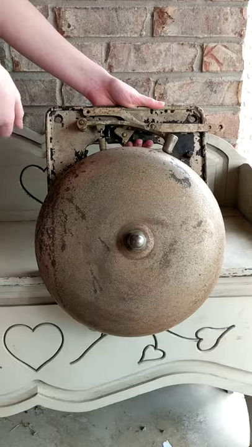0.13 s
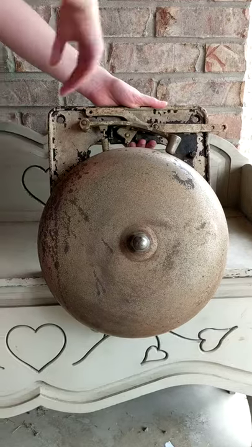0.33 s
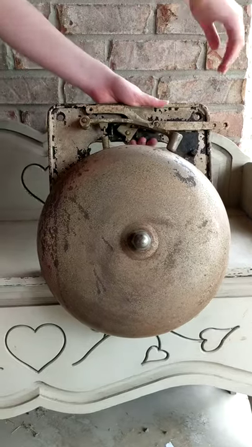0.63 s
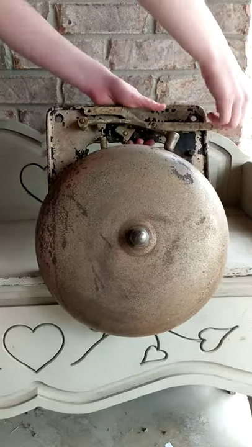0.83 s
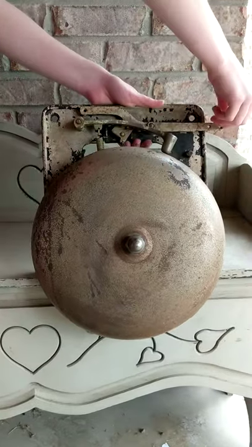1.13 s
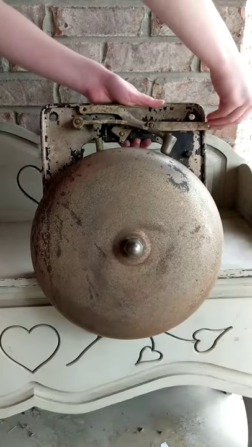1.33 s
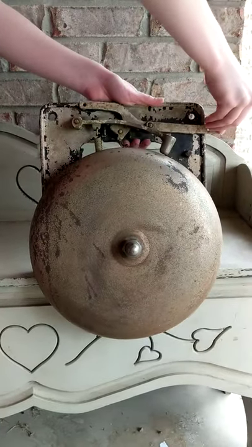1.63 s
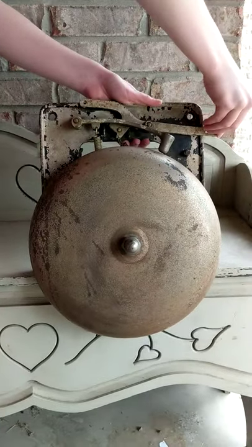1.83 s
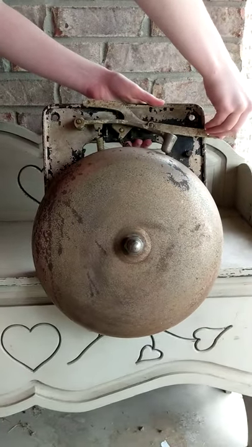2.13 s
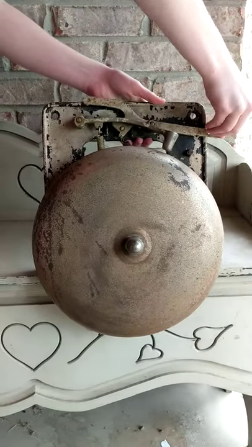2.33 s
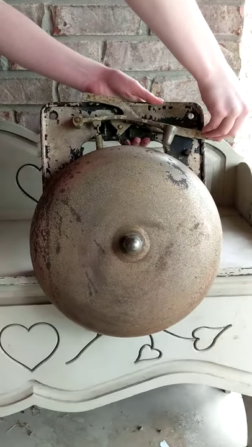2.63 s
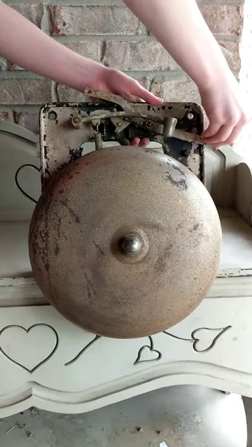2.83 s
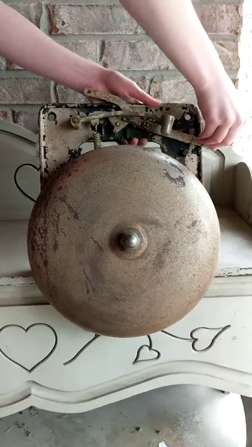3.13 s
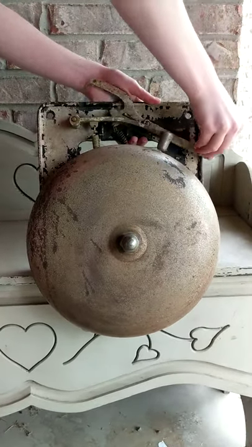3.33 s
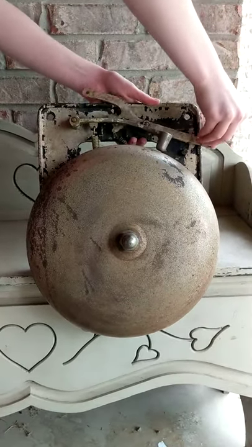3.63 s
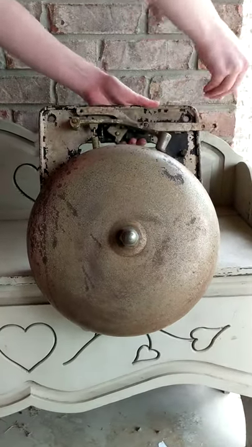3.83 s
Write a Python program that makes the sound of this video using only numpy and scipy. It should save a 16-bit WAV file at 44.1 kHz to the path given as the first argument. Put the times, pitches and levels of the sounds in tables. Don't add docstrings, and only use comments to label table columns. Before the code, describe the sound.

After over three seconds of low hush, faint bird chirps and soft bumps, a hammer hits a metal gong once, hard and bright; the ring fades fast and the lever clicks home. Close, slightly overloaded recording.

```python
import sys
import numpy as np
from scipy import signal
from scipy.fft import rfft, irfft
from scipy.io import wavfile
from scipy.ndimage import uniform_filter1d

SR = 44100
rng = np.random.default_rng(int(sys.argv[2]) if len(sys.argv) > 2 else 0)


def invert_db(x):
    u = np.asarray(x, float) / 20
    return 10 ** u


def put_to_file(sound):
    columns = np.atleast_2d(sound).T
    safe = np.clip(columns, -1, 1)
    whole_steps = np.round(safe * 32767)
    wavfile.write(sys.argv[1], SR, whole_steps.astype(np.int16))


N = 176400

# pitch_hz, level_db, t60_s
RIM_MODES = [(247.1, -56, 40), (631.5, -45, 7.5), (1093.4, -49, 6), (1617.9, -33.5, 1.4),
             (2188.1, -44, 3.4), (2814.2, -18, 1.13), (3490.2, -23, 1.05), (4208.5, -20, .47),
             (4986.5, -17, .32), (5810.6, -28, .52), (6679.8, -16, .35), (7608, -11.5, .21),
             (8580.6, -10, .29), (9609.9, -17, .22)]
# offset_hz, level_db, t60_s, lead_turns
RIM_TWINS = [(-5.7, -57.5, 40, .19), (-2.4, -66, 40, .04), (3.2, -54, 8, -.27), (-1.3, -34.5, 3, -.46),
             (4.6, -45, 3.5, -.12), (1.4, -46, 40, -.34), (-3.6, -40, 1.13, .12), (3.2, -22, .4, -.49),
             (3, -36, .58, -.46), (5, -47, .6, .1), (1.3, -42, .77, .37), (6, -42, .45, .1),
             (5.5, -20.5, .49, -.41), (6.8, -41, .46, .33)]
# pitch_hz, level_db, t60_s
DOME_MODES = [(1979, -46.5, 1.05), (1992, -44, .95), (2191, -15, .17), (2711, -45, 1.2), (3235, -57.5, 5.8),
              (4002, -17, .19), (4432, -48, 1), (4679, -29, .3), (5106, -29, .45), (5192, -15.5, .21),
              (5528, -30, .4), (5561, -31, .45), (5629, -31.5, .95), (5634, -36, .6), (5675, -15, .14),
              (5678, -41, 1.1), (6273, -37, .39), (6419, -16.5, .19), (7189, -19, .28), (7334, -18, .27),
              (7524, -27, .33), (7638, -28, .3), (7679, -32, .44),
              (8793, -27, .33), (9012, -29, .52), (9120, -26, .34), (9243, -29, .31), (9838, -32, .47),
              (9916, -37, .33), (10048, -35, .43), (10251, -37, .24), (10693, -19, .22), (10696, -36, .5),
              (11088, -41, .4), (11421, -31, .38), (11464, -43, .4), (11499, -49, .6), (11575, -38, .22),
              (11832, -28, .18), (12381, -54, .47), (12527, -38, .25), (13050, -55, .3), (13520, -47, .25),
              (14248, -38, .26), (14530, -48, .29), (14968, -72, .9), (15350, -55, .3), (15563, -38, .16),
              (15597, -44, .27), (16450, -56, .25), (16869, -42, .17), (16906, -44, .24)]
# start_s, thud_db, clack_db, length_s, clack_treble_db
BLOWS = [(2.176, -45.5, -72, .016, -25), (2.192, -46, -84, .008, -25), (2.35, -63, -95, .02, -20),
         (3.372, -58, -55, .012, -10), (3.381, -43, -58, .016, -10), (3.4017, -40, -19, .002, -8),
         (3.4033, -16.5, 4.5, .009, -10), (3.777, -40, -31, .0069, -5), (3.7889, -31, -9, .0033, 0),
         (3.7945, -31, -20, .002, 0), (3.7995, -45, -23, .002, 0), (3.8045, -45, -19, .0012, 0),
         (3.819, -48, -27, .002, 0)]
# pitch_hz, level_db, t60_s
TABLE_MODES = [(65, -2, .05), (130, -1, .09), (158, -7, .1), (297, -6, .06), (393, -11, .08), (482, 1, .1),
               (560, -8, .05), (680, -1, .05), (820, -12, .05), (975, -6, .07), (1320, -15, .04),
               (1830, -22, .03)]
# frequency_hz, density_db
THUD_SPECTRUM = [(35, -38), (60, -9.5), (669, -11), (1080, -21), (1340, -10), (1510, -19), (9000, -47),
                 (11700, -75), (19800, -120)]
# frequency_hz, density_db
CLACK_SPECTRUM = [(300, -23.5), (1500, -13.5), (3500, -9), (6500, -9.5), (9000, -5.5), (11500, -24),
                  (14800, -25), (15900, -56)]
# pitch_hz, level_db, t60_s
LEVER_MODES = [(5670, -8, .035), (6600, -2, .012), (8530, -1, .018), (11200, -14, .015)]
# start_s, pitch_hz, level_db, length_s
TABLE_BUMPS = [(0.468, 76.2, -47.5, 0.073), (.985, 152, -42.5, 0.022), (1.166, 270, -57, 0.044),
               (1.402, 274, -46, 0.034), (1.694, 717, -64, .03), (1.76, 700, -65, .035),
               (2.246, 250, -52, 0.019), (2.76, 465, -61.5, 0.036), (2.817, 79.1, -47.5, 0.05),
               (3.455, 162, -32, .05), (3.56, 170, -42, .06), (3.64, 72, -51, .06), (3.5, 95, -42, .06),
               (2.34, 590, -59, .025), (3.58, 490, -48, .1), (3.81, 400, -36, .035), (3.92, 405, -46, .05),
               (2.24, 420, -60, .04), (3.404, 305, -18, .025), (3.408, 478, -19, .022), (3.45, 360, -30, .04),
               (2.179, 705, -46, .012), (2.255, 180, -49, .03), (1.96, 72, -50, .06)]
# start_s, length_s, level_db
FINGER_BRUSHES = [
    (0.959, 0.28, -70.5),
    (1.68, 0.061, -69.5),
    (1.7, .014, -70),
    (2.95, 0.096, -70.5),
]
# frequency_hz, level_db
BRUSH_SPECTRUM = [(1500, -25), (4000, -6), (8500, -7), (9600, -8), (10500, -22)]
# start_s, length_s, start_hz, end_hz, level_db
BIRD_WHISTLES = [(0.1, .06, 8000, 7950, -74), (.2, 0.055, 4300, 4246, -66.5),
                 (0.329, 0.11, 4300, 4300, -69.5), (.485, 0.055, 4280, 4300, -74),
                 (.25, 0.021, 3490, 2960, -64.5), (0.365, .035, 4100, 2960, -66),
                 (0.413, 0.026, 3300, 3050, -66.5), (0.439, 0.027, 3530, 2660, -68),
                 (1.38, 0.2, 6540, 6580, -73.5), (1.376, 0.14, 6860, 6800, -76),
                 (1.703, 0.152, 4150, 4080, -73), (1.699, .12, 3680, 3550, -75.5),
                 (1.76, 0.12, 4350, 3850, -77), (1.7, .012, 3350, 3750, -67),
                 (1.852, 0.03, 3150, 3500, -70), (1.83, .02, 3300, 2900, -72), (1.14, .07, 4780, 4740, -74),
                 (2.034, .12, 5380, 5230, -75.5)]
SEEP_STARTS = [.305, .465, .59, .715, .835, .96]
CHIP_STARTS = [.525, .648, .772, .897, 1.019, 1.14]
# frequency_hz, density_db
HUSH_SPECTRUM = [(15, -52), (25, -7.5), (70, 0.5), (173, -8), (204, -18), (267, -14), (323, -19),
                 (3280, -33), (16800, -48)]
# frequency_hz, t60_s
ROOM_DECAY = [(100, 0.21), (500, 0.34), (2000, 0.25), (6000, 0.23), (14000, 0.15)]

STRIKE_S, STRIKE_RISE_S = 3.4027, 0.002
RIM_DB = 3
BLOOM_DB, BLOOM_S, BLOOM_TOP_HZ = -6, 0.02, 3000
SWARM_DB, SWARM_TILT_DB_PER_KHZ, SWARM_T60_S = -45.5, -2.5, 0.29
SWARM_LO_HZ, SWARM_HI_HZ = 2310, 16440
THUD_RISE_S, SHUDDER_S = 0.0023, 0.0093
TABLE_DB, LEVER_DB = 4.5, -4.5
SPOT_DETUNE, SPOT_DB = 0.03, 3
SEEP_HZ, SEEP_DB, SEEP_LENGTH_S = 7270, -71.5, 0.036
CHIP_DB, CHIP_TOP_HZ, CHIP_END_HZ, CHIP_LENGTH_S = -68, 4730, 3196, 0.042
ROOM_DB = -4
LATE_DB, LATE_STRETCH = -26, 2.9
HUSH_DB, PATCH_DB = -55.5, 0.5
RUMBLE_HZ, RUMBLE_LUMP_DB = 250, 2
MIC_LOW_HZ, CEILING = 40, 0.88
START_S, FADE_DB, FADE_S = 0.1, -4.5, 0.32
DUCK_DB, DUCK_ATTACK_S, RECOVER_DB_PER_S = 16, 0.0012, 27


def evened(x):
    return x / np.sqrt(np.mean(x ** 2) + 1e-20)


def read(points, hz):
    point_hz, value = np.transpose(points)
    return np.interp(np.log(hz + 1), np.log(point_hz + 1), value)


def add(mix, start_s, sound):
    part = mix[round(start_s * SR):][:len(sound)]
    part += sound[:len(part)]


def coloured(spectrum, size):
    gain = invert_db(read(spectrum, np.fft.rfftfreq(size, 1 / SR)))
    white = rng.standard_normal(size)
    return evened(irfft(rfft(white) * gain, size))


def ring(modes, t):
    return sum(invert_db(db - 60 * t / t60) * np.sin(2 * np.pi * (hz * t + rng.random()))
               for hz, db, t60 in modes)


def gong():
    out = np.zeros(N)
    t = np.arange(0, N / SR - STRIKE_S, 1 / SR)
    sound = ring(DOME_MODES + swarm(), t)
    for (hz, db, t60), (offset_hz, twin_db, twin_t60, lead) in zip(RIM_MODES, RIM_TWINS):
        turns = hz * t + rng.random()
        twin_turns = turns + offset_hz * t + lead
        swell_db = RIM_DB + BLOOM_DB * np.exp(-t / BLOOM_S) * (hz < BLOOM_TOP_HZ)
        sound += invert_db(swell_db + db - 60 * t / t60) * np.sin(2 * np.pi * turns)
        sound += invert_db(swell_db + twin_db - 60 * t / twin_t60) * np.sin(2 * np.pi * twin_turns)
    onset = np.minimum(t / STRIKE_RISE_S, 1) ** 2
    add(out, STRIKE_S, invert_db(DUCK_DB) * sound * onset)
    return out


def swarm(count=70):
    place, strength, life = rng.random((count, 3)).T
    hz = SWARM_LO_HZ + (SWARM_HI_HZ - SWARM_LO_HZ) * place
    db = SWARM_DB + 14 * strength + SWARM_TILT_DB_PER_KHZ * abs(hz - 7000) / 1000
    t60 = SWARM_T60_S * (0.5 + life) * (5000 / hz) ** 0.27
    return list(zip(hz, db, t60))


def mechanism():
    t, out = np.arange(8192) / SR, np.zeros(N)
    for start_s, thud_db, clack_db, length_s, treble_db in BLOWS:
        burst = np.minimum(t / 0.00027, 1) * np.exp(-t / length_s)
        thud = np.minimum(t / THUD_RISE_S, 1) * burst * coloured(THUD_SPECTRUM, len(t))
        shudder = rng.standard_normal(len(t)) * np.exp(-t / SHUDDER_S) / np.sqrt(SHUDDER_S * SR)
        chance = rng.uniform(-1, 1, (len(TABLE_MODES), 2))
        spot = [(hz * (1 + SPOT_DETUNE * a), db + SPOT_DB * b, t60)
                for (hz, db, t60), (a, b) in zip(TABLE_MODES, chance)]
        response = np.minimum(t / 0.0008, 1) * ring(spot, t)
        thud += invert_db(TABLE_DB) * signal.fftconvolve(shudder, response)[:len(t)]
        edge = [(hz, db + treble_db * (hz > 10000)) for hz, db in CLACK_SPECTRUM]
        clack = burst * coloured(edge, len(t))
        clack += invert_db(LEVER_DB + treble_db / 2) * ring(LEVER_MODES, t)
        add(out, start_s, invert_db(thud_db) * thud + invert_db(clack_db) * clack)
    return out


def hands_and_table():
    out = np.zeros(N)
    for start_s, hz, db, length_s in TABLE_BUMPS:
        u = np.arange(0, 3, 1 / (SR * length_s))
        swell = 5 * u * np.exp(-2 * u)
        add(out, start_s, invert_db(db) * swell * np.sin(2 * np.pi * hz * length_s * u))
    for start_s, length_s, db in FINGER_BRUSHES:
        hiss = coloured(BRUSH_SPECTRUM, 16384)[:round(length_s * SR)]
        add(out, start_s, invert_db(db) * hiss * np.hanning(len(hiss)))
    return out


def note(hz, db, depth=0.35):
    size = len(hz)
    waver = evened(uniform_filter1d(rng.standard_normal(16384), size=300))[:size]
    flutter = 1 + depth * np.sin(2 * np.pi * (55 * np.arange(size) / SR + rng.random()))
    turns = np.cumsum(hz * (1 + 0.006 * waver)) / SR
    return invert_db(db) * flutter * np.hanning(size) ** 0.19 * np.sin(2 * np.pi * turns)


def birds():
    out = np.zeros(N)
    for start_s, length_s, start_hz, end_hz, db in BIRD_WHISTLES:
        glide_hz = np.linspace(start_hz, end_hz, round(length_s * SR))
        depth = 0.72 + 0.43 * (1.65 < start_s < 1.8)
        add(out, start_s, note(glide_hz, db, depth))
    for start_s in SEEP_STARTS:
        droop = np.linspace(1.005, 0.995, round(SEEP_LENGTH_S * SR))
        add(out, start_s, note(SEEP_HZ * (1 - 0.02 * (start_s - 0.3)) * droop, SEEP_DB))
    u = np.linspace(0, 1, round(CHIP_LENGTH_S * SR))
    accent = 0.9 - 0.15 * (u < 0.3) + 0.8 * (u > 0.6) * (u < 0.88)
    for start_s in CHIP_STARTS:
        delay, strength = rng.uniform(-1.03, 1, 2)
        fall = 1 / (1 + np.exp((u - 0.45 - 0.052 * delay) / 0.067))
        hz = CHIP_END_HZ + (CHIP_TOP_HZ - CHIP_END_HZ) * fall
        add(out, start_s, note(hz, CHIP_DB + 1.6 * strength) * accent)
    return out


def room(x):
    taps = np.zeros(SR // 2)
    at = np.arange(120, len(taps) - 20, 20)
    taps[at + rng.integers(0, 20, len(at))] = rng.choice([-1., 1.], len(at))
    hz, t, z = signal.stft(taps, SR, nperseg=256)
    fall_db = -60 * t / read(ROOM_DECAY, hz)[:, None]
    decay = invert_db(fall_db) + invert_db(LATE_DB + fall_db / LATE_STRETCH)
    tail = signal.istft(z * decay, SR, nperseg=256)[1]
    return signal.fftconvolve(x, tail / np.linalg.norm(tail))[:N]


def hush():
    frames, hz = N // 256 + 5, np.fft.rfftfreq(1024, 1 / SR)
    real, imaginary, patches = rng.standard_normal((frames, 513, 3)).T
    patches = evened(uniform_filter1d(uniform_filter1d(patches, 10, 0), 12, 1))
    lumps = evened(uniform_filter1d(rng.standard_normal(frames), size=8))
    low = 1 / (1 + (hz / RUMBLE_HZ) ** 2)
    level_db = read(HUSH_SPECTRUM, hz)[:, None] + PATCH_DB * patches
    level_db = level_db + RUMBLE_LUMP_DB * low[:, None] * lumps
    z = (real + 1j * imaginary) * invert_db(level_db)
    return invert_db(HUSH_DB) * evened(signal.istft(z, nperseg=1024, noverlap=768)[1][:N])


def scene():
    near, far = mechanism(), birds()
    direct = gong() + near + hands_and_table() + far
    reverberant = room(invert_db(ROOM_DB) * near + 0.83 * far)
    return (direct + reverberant + hush())[None]


def low_pass(x):
    return signal.sosfilt(signal.butter(12, 16940, fs=SR, output="sos"), x)


def record(dry):
    t = np.arange(N) / SR
    since_s = t - STRIKE_S
    fade_db = FADE_DB * np.clip(1 - (t - START_S) / FADE_S, 0, 1)
    duck_db = np.clip(since_s / DUCK_ATTACK_S, 0, 1) * np.maximum(DUCK_DB - RECOVER_DB_PER_S * since_s, 0)
    x = signal.sosfilt(signal.butter(3, MIC_LOW_HZ, "high", fs=SR, output="sos"), dry)
    x = x * invert_db(fade_db - duck_db) * (t > START_S)
    return low_pass(np.clip(x, -CEILING, CEILING))


dry = scene()
out = record(dry)
put_to_file(out)
```